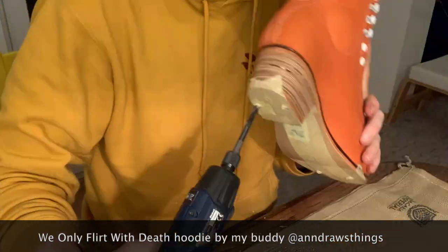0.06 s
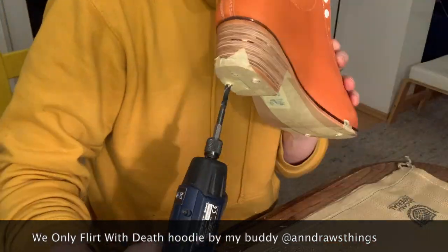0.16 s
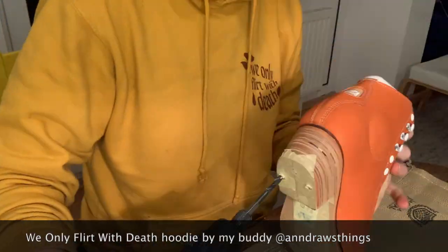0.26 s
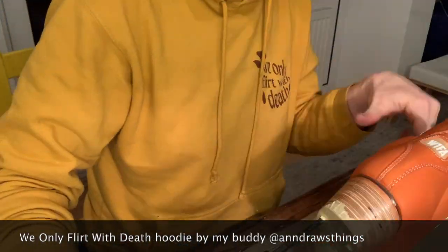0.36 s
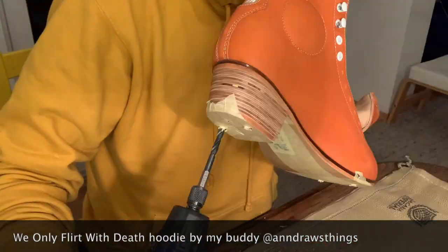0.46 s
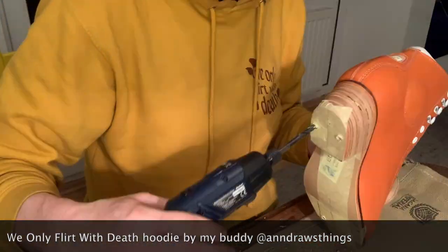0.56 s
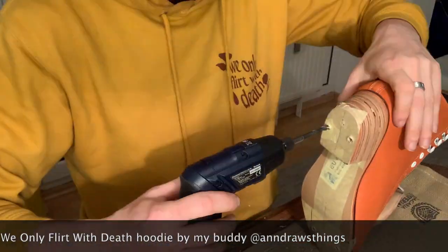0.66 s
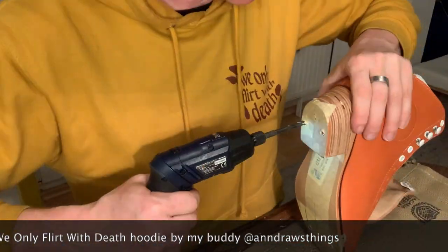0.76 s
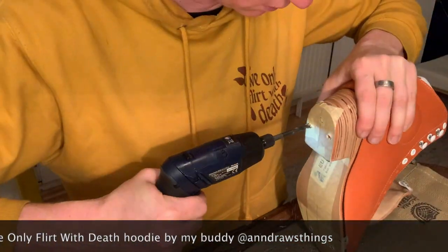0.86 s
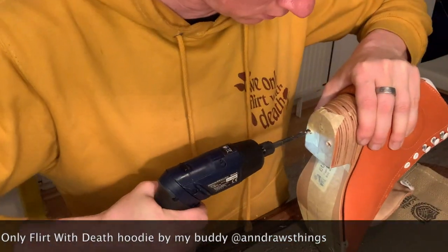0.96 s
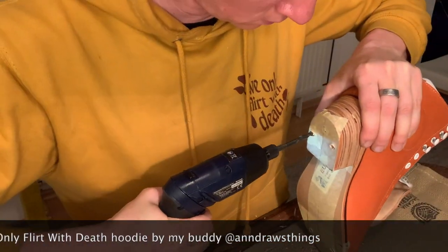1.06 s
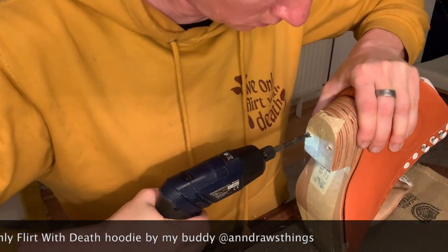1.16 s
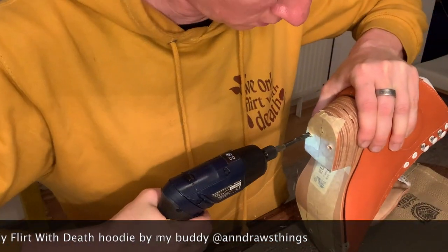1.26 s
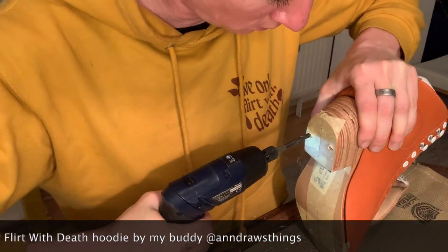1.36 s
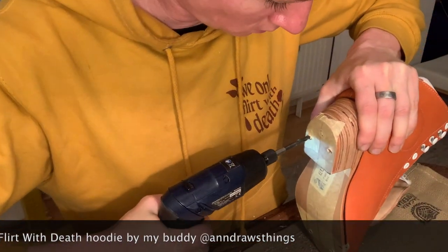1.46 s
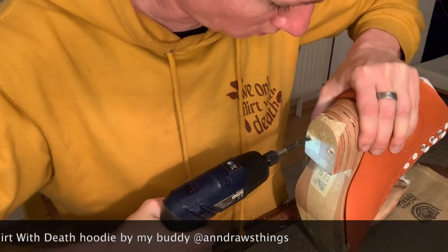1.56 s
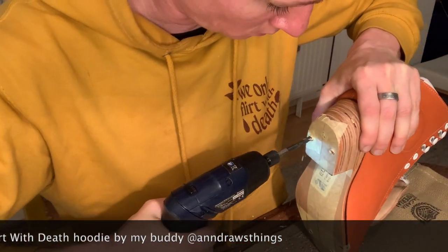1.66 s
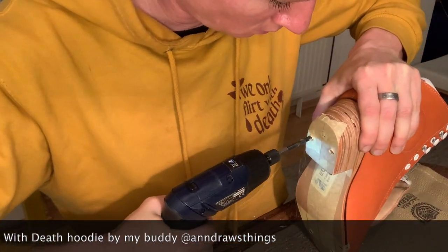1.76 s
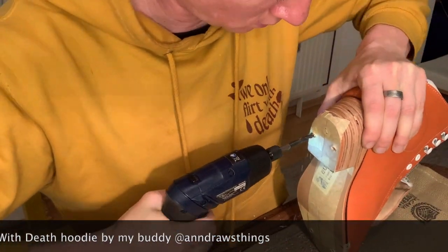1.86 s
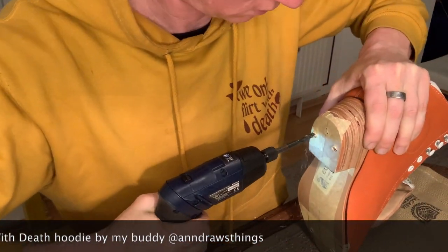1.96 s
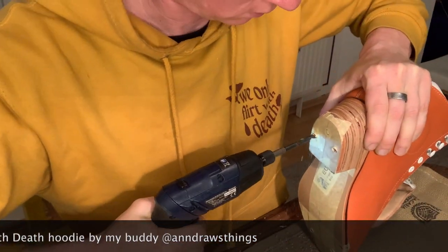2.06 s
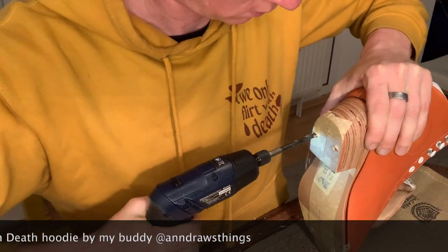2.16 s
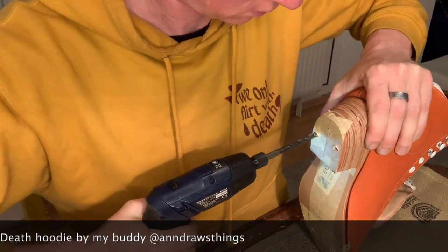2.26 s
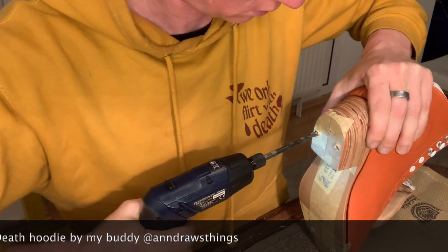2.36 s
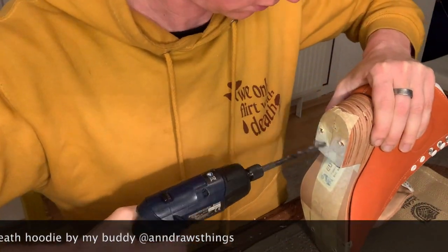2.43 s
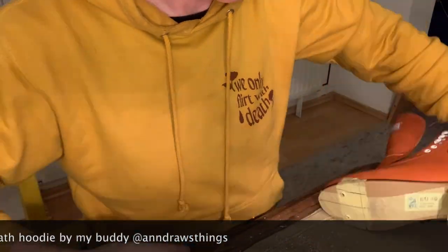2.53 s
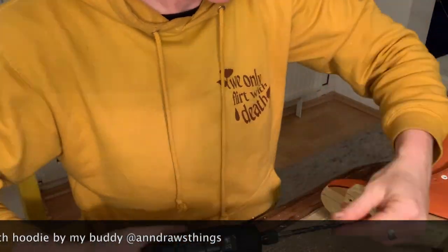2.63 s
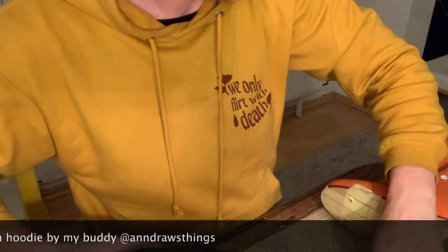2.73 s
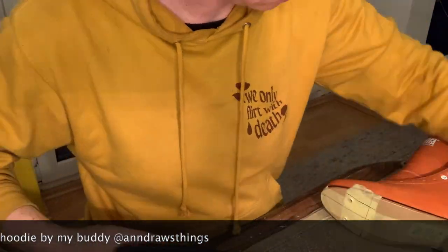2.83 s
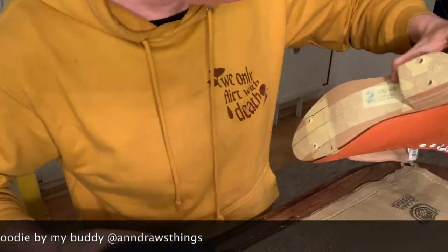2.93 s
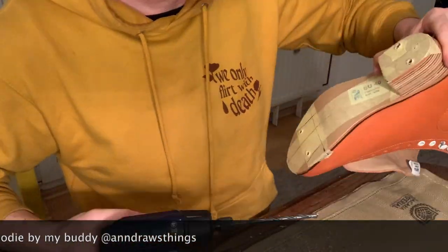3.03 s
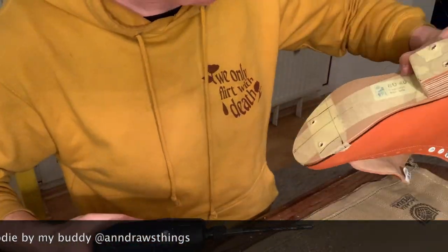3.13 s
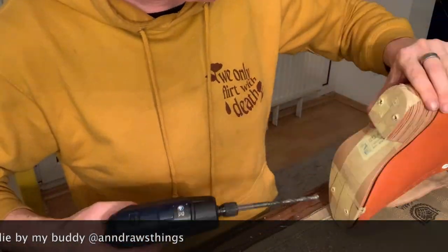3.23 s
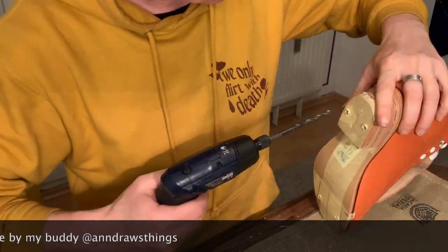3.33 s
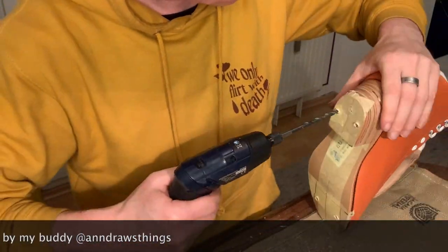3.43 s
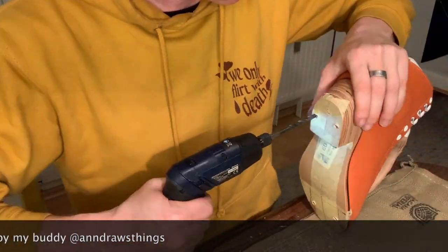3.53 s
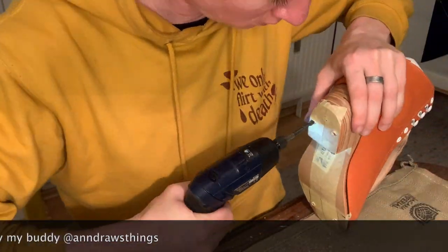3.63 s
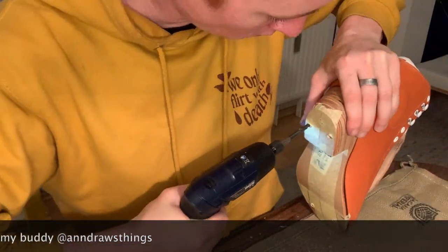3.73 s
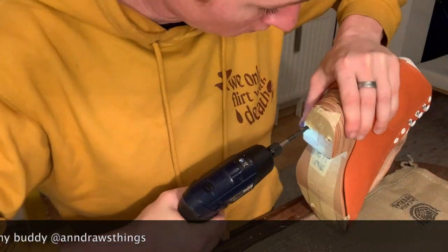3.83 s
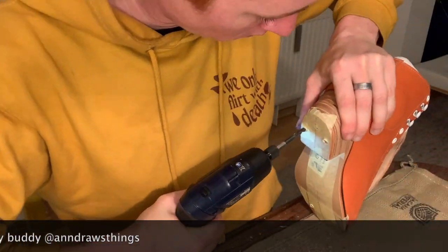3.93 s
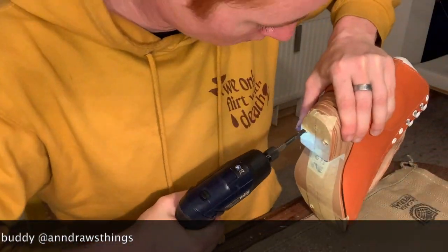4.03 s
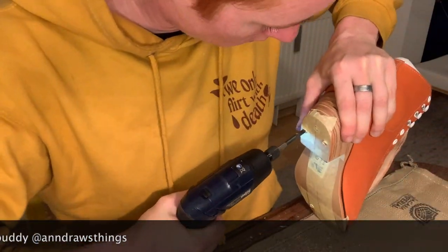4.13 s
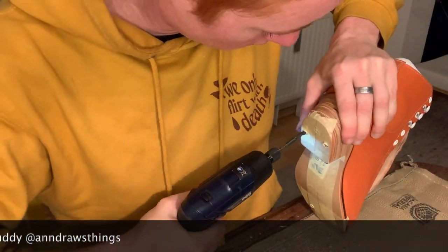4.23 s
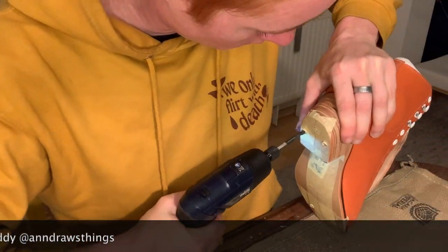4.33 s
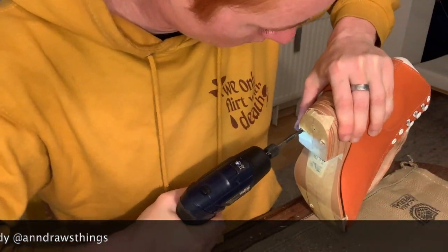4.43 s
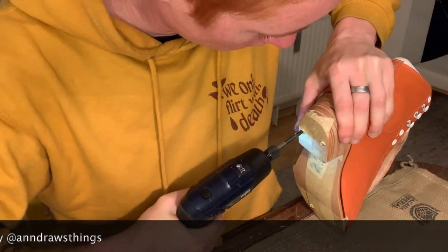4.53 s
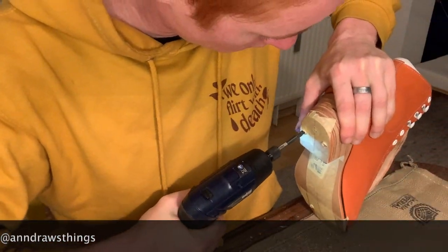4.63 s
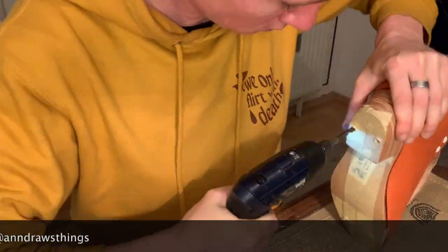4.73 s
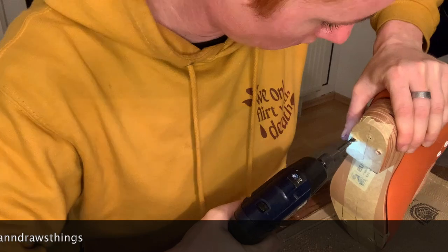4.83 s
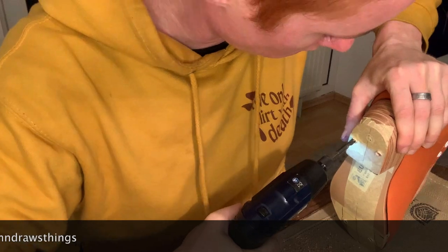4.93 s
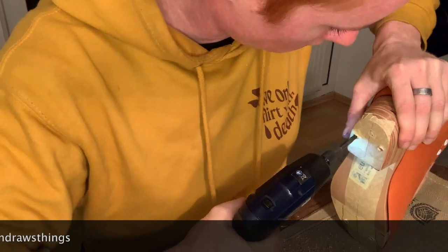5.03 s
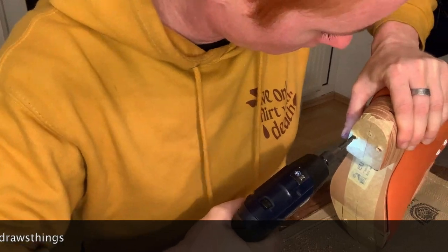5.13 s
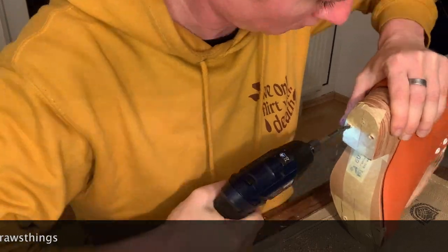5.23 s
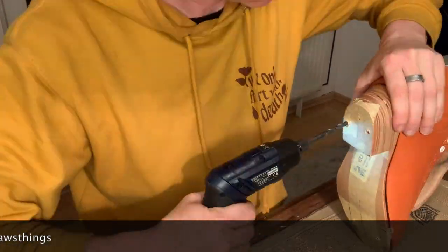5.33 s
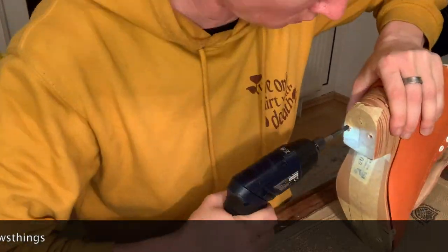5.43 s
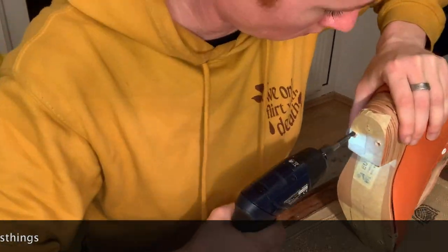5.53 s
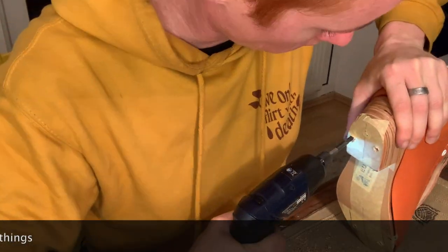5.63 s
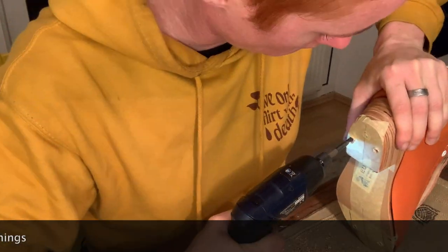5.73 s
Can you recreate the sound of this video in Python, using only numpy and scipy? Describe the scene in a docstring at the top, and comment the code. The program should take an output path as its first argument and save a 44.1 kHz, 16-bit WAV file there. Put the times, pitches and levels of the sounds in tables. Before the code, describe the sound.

Hands rustle and tick against a shoe, with two firm hollow clacks from a loose drill chuck. A small cordless drill then bores wood with a bright, gritty whine, speeds up as it eases, and stops. A clack and a sinking motor tone follow in the quiet, with light handling, before a second, more uneven bore starts and continues to the end. Close stereo microphone, small dry room.

```python
"""A small cordless drill bores twice into the wooden heel of a shoe, close to a stereo microphone in a small room.
Its tones are sines locked to one gear shaft: lower as the bit bites and snags, higher as it runs free.
Shaped noise gives the rasp of gears and wood, and drives the ring of the drill's shell.
The chuck clacks in its play as a bank of dying modes; hands and sleeves brush the shoe as swells of noise.
A free motor tone sinks after the first bore, over quiet air, two hum tones and a short diffuse room."""
import sys
import numpy as np
from scipy import signal
from scipy.fft import rfft, irfft, next_fast_len
from scipy.io import wavfile
from scipy.ndimage import uniform_filter1d, map_coordinates

SR = 44100
rng = np.random.default_rng(int(sys.argv[2]) if len(sys.argv) > 2 else 0)


def wrap_up_sound(samples):
    """Save the sound to the file named by the first command line argument, as 16-bit audio."""
    columns = np.atleast_2d(samples).T
    # keep every value between -1 and 1, then stretch to whole-number steps
    tamed = np.clip(columns, -1, 1)
    steps = np.round(tamed * 32767).astype(np.int16)
    wavfile.write(sys.argv[1], SR, steps)


N = 254898


def amp(db):
    """Decibels to gain."""
    return 10 ** (np.asarray(db) / 20)


def unit(x):
    """Scale to rms 1."""
    return x / np.sqrt(np.mean(x ** 2) + 1e-20)


def clock():
    """Time of each sample, in s."""
    return np.arange(N) / SR


def along(points, hz):
    """(f/Hz, value) points read on a log frequency axis."""
    f, v = np.transpose(points)
    return np.interp(np.log(hz + 1), np.log(f + 1), v)


def curves(rows):
    """One value per sample for each column after the time."""
    s, *cols = np.transpose(rows)
    return [np.interp(clock(), s, c) for c in cols]


def wobble(rate):
    """A smooth random curve, rate knots a second."""
    knots = rng.standard_normal(int(N * rate / SR) + 4)
    return map_coordinates(knots, [clock() * rate])


def swell(s, length):
    """A smooth rise and fall around time s."""
    return np.exp(-(2 * (clock() - s) / length) ** 2)


def ramp(x, start, end):
    """0 at start, 1 at end, held beyond."""
    return np.clip((x - start) / (end - start), 0, 1)


def filtered(x, response):
    """x times a response, real or complex, of frequency."""
    n = x.shape[-1]
    m = next_fast_len(n + 8192)
    spectrum = rfft(x, m) * response(np.fft.rfftfreq(m, 1 / SR))
    return irfft(spectrum, m)[..., :n]


def noise(spectrum):
    """Coloured noise of rms 1."""
    return unit(filtered(rng.standard_normal(N), lambda hz: amp(along(spectrum, hz))))


def add(track, s, sound):
    """Mix a sound into the track at time s."""
    part = track[max(round(s * SR), 0):][:len(sound)]
    part += sound[:len(part)]


# spectrum of the quiet room air: f/Hz, relative level/dB per Hz
AIR = [(30, -44), (130, -39), (200, -17), (280, -2), (420, -1), (620, 6.5), (800, -7.5), (1500, -14),
       (4000, -26.5), (15000, -35.5)]
HUM_LOW_DB, HUM_HIGH_DB, HUM_WAVER_DB = -73, -72.5, 1


def background():
    """Quiet room air with two hum tones that waver in level and phase."""
    low_level = amp(HUM_LOW_DB + HUM_WAVER_DB * wobble(9.7))
    low = low_level * np.sin(2 * np.pi * 307 * clock() + 0.26 * wobble(14))
    high_level = amp(HUM_HIGH_DB + HUM_WAVER_DB * wobble(4))
    high = high_level * np.sin(2 * np.pi * 622 * clock() + 1.6 * wobble(30))
    return low + high + amp(-69.5) * noise(AIR)


# resonances of the drill's shell: f/Hz, width/Hz, relative level/dB
HOUSING = [(303, 15, -15.5), (608, 60, -4.5), (778.5, 40, -3.5), (917, 45, 2), (1007, 45, -0.5),
           (1091.5, 29, 5.5), (1178, 26, -2.5), (1404, 99, -0.5), (1712, 30, -2), (1862, 73, -5),
           (2475, 55, 4), (2627, 50, -1.5)]


def housing(x):
    """The shell's resonances, summed with alternating sign, ring when x shakes them; rms 1."""
    def modes(f):
        total = 0
        for k, (center, width, db) in enumerate(HOUSING):
            resonance = 1j * f * width / (center * center - f * f + 1j * f * width)
            total = total + (-1) ** k * amp(db) * resonance
        return total

    return unit(filtered(x, modes))


# strokes of hands and sleeves: middle t/s, length/s, rub level/dB, brush level/dB
STROKES = [(0.021, 0.071, -52.5, -69), (0.127, 0.021, -84, -63.5), (0.253, 0.12, -81, -71.5),
           (.39, 0.082, -59, -66), (0.687, 0.16, -59, -70.5), (2.622, 0.054, -60, -69),
           (2.923, 0.079, -79, -74), (2.995, 0.012, -79, -67.5), (3.331, .14, -73.5, -84.5),
           (3.491, 0.012, -72, -77), (3.533, 0.052, -63, -62.5)]
# spectrum of the sleeve brush: f/Hz, relative level/dB per Hz
BRUSH = [(300, -11.5), (1500, 1.5), (4000, 6), (8000, -1.5), (15000, -7.5)]
# small ticks of handling: t/s, level/dB before the attack and decay
TICKS = [(0.0365, -55.5), (0.064, -47), (0.1166, -59), (0.334, -54), (0.384, -53), (0.4289, -58),
         (2.657, -61), (2.794, -65), (2.9917, -65), (3.5148, -56.5)]
# a finger slips on the shoe: t/s, f/Hz, level/dB
SQUEAK = (2.852, 5500, -62)


def handling():
    """Hands rub the tool, sleeves brush, and fingers tick and squeak against the shoe."""
    rubbing = sum(amp(db) * swell(s, length) for s, length, db, _ in STROKES)
    brushing = sum(amp(db) * swell(s, length) for s, length, _, db in STROKES)
    rub = rubbing * amp(2 * wobble(50)) * housing(noise([(1100, 1.0), (2500, -20.5)]))
    brush = brushing * amp(3.5 * wobble(60) + 1.1 * wobble(1400)) * noise(BRUSH)
    taps, t = np.zeros(N), np.arange(SR // 10) / SR
    for s, db in TICKS:
        attack = 1 - np.exp(-t / 0.00069)
        add(taps, s, amp(db - 60 * t / 0.027) * attack)
    ticks = taps * noise([(500, -23), (3000, -0.5), (9000, 0), (15000, -10)])
    s, hz, db = SQUEAK
    squeak = amp(db) * swell(s, 0.01) * np.sin(2 * np.pi * hz * clock() + wobble(400))
    return rub + brush + squeak + ticks


# the chuck knocks in its play: t/s, level/dB, treble relative level/dB, low modes change/dB
CLACKS = [(0.041, -56, -20, 2), (0.28, -12, -22, -4), (0.618, -7, -17.5, -3.5), (0.829, -28.5, -14, -15),
          (1.911, -28, -5.5, -29), (2.559, -15, -10.5, -7.5), (2.607, -32, -22, 11.5),
          (2.829, -35.5, -20.5, -3), (2.885, -41.5, -19, 13), (3.276, -42.5, -31, 22),
          (4.765, -29, -35, 10), (5.232, -26, -11, -14), (5.331, -28, -32.5, 0.5)]
# ringing modes of the chuck: f/Hz, relative level/dB, t60/s
CHUCK = [(273, -25, .06), (416.6, -13.5, 0.063), (528.6, -10.5, 0.078), (620, -18.5, .1), (750, -16, 0.046),
         (786, -24, 0.073), (880, -6.5, 0.041), (890, -2.5, 0.049), (1013, 2.5, .065), (1080.7, -3, 0.12),
         (1110, 0.5, 0.057), (1175, -15.5, .1), (1423, -8.5, 0.083), (1713, -18.5, .08), (2036, -30, 0.074),
         (2210, -22, 0.049), (2472, -20, .06), (2700, -15, .05)]
# spectrum of the contact noise: f/Hz, relative level/dB per Hz
CRACK = [(100, -53.5), (200, -27.5), (400, 1), (1200, 8.5), (2500, 6), (3100, -2.5), (3800, -8.5),
         (6000, -14.5), (8700, -8), (15000, -28)]


def clacks():
    """Each knock of the chuck rings its modes, with a crack and a weaker rebound."""
    out, t = np.zeros(N), np.arange(SR // 4) / SR
    hz, level, t60 = np.transpose(CHUCK)[:, :, None]
    crack = noise(CRACK)
    contact = 1 - np.exp(-(t / .0016) ** 2)  # a soft onset of a few ms
    for s, db, treble_db, low_db in CLACKS:
        # a harder blow wakes the high modes
        hard = .9 * (treble_db + 15.5) * np.clip(np.log2(hz / 1000), 0, 1)
        size, turn = rng.standard_normal((2, len(CHUCK), 1))
        mode_db = level + hard + low_db * (hz < 700) + 2.2 * size - 60 * t / t60
        modes = amp(mode_db) * np.sin(2 * np.pi * hz * (t - .002) + 0.5 * turn)
        ring = modes.sum(0)
        burst = np.roll(crack, -round(s * SR))[:len(t)] * amp(-60 * t / 0.057)
        blow = contact * (amp(db - 0.5) * ring / abs(ring).max() + amp(db + treble_db) * burst)
        add(out, s, blow)
        add(out, s + .0105, amp(-24.5) * blow)  # rebound
    # a small tool radiates no bass
    return filtered(out, lambda hz: 1 / (1 + (170 / (hz + 1)) ** 4))


# trigger held: from t/s, to t/s
BORES = [(0.789, 2.47), (3.548, 5.8)]
SPIN_UP_S, RUN_DOWN_DB_PER_S = .01, 341.5


def trigger():
    """The drive comes on almost at once and dies away after each release."""
    t = clock()
    drive = 0
    for on, off in BORES:
        drive = drive + ramp(t, on, on + SPIN_UP_S) * amp(-RUN_DOWN_DB_PER_S * np.maximum(t - off, 0))
    return drive


# each push grips the tool anew: t/s, time to bite/s, then base level/dB of
# low tooth tone, high tooth tone, whine, squeal, fizz, rattle
PUSHES = [ (.79, 0.79, -50, -47.5, -47.5, -39.5, -46.5, -52.5),
          (3.55, 0.23, -53.5, -53.5, -49.5, -38, -45, -60),
          (4.0, 0.013, -57.5, -49.5, -53, -41.5, -45, -55),
          (4.76, .12, -52.5, -50.5, -45.5, -44.5, -34, -53.5), (5.36, 0.6, -49, -50, -45, -44, -34, -52), ]


def grip():
    """How far the bit has bitten (0-1) and the levels of the push, gliding from one push to the next."""
    pushes = np.array(PUSHES)
    current = np.maximum(np.searchsorted(pushes[:, 0], clock()) - 1, 0)
    start, bite_s, *levels = pushes[current].T
    bitten = ramp(clock(), start, start + bite_s)
    return uniform_filter1d(np.array([bitten, *levels]), size=SR // 20, axis=1)


# the bit catches: t/s, share of speed lost
SNAGS = [(4.049, 0.061), (4.116, .15), (4.165, 0.0419), (4.223, .09), (4.286, .22), (4.331, .2),
         (4.363, .21), (4.464, 0.0519), (5.662, 0.067)]


def snags():
    """Share of the shaft speed lost as the bit catches in the wood."""
    return sum(lost * np.exp(-((clock() - s) / .011) ** 2) for s, lost in SNAGS)


def tooth_tone(angle, order, jitter, flutter_db):
    """One line of the gears, order cycles a shaft turn; uneven teeth blur its phase and strength."""
    wave = np.sin(order * angle + jitter * wobble(420))
    return unit(wave * amp(flutter_db * np.clip(wobble(110), -2, 2)))


# gearbox resonances that the tooth tones pass through: f/Hz, half width/Hz, lift/dB
GEARBOX = [(1447, 60, 6), (2648, 76, 9.5), (4590, 190, 15), (8100, 440, 7.5)]


def gearbox(speed, order):
    """Gain of a tooth tone as it passes the resonances of the gearbox."""
    gain = 1
    for hz, width, db in GEARBOX:
        gain = gain + (amp(db) - 1) / (1 + ((order * speed - hz) / width) ** 2)
    return gain


def gear_tones(speed, cut, snag, load, slack, low_db, high_db, whine_db, squeal_db, rasp_db):
    """Sines at multiples of one shaft angle, lifted by the gearbox and blurred by the teeth."""
    angle = 2 * np.pi * np.cumsum(speed) / SR
    low = tooth_tone(angle, order=9, jitter=.65 - .55 * load, flutter_db=1.5)
    tones = amp(low_db - 20 * snag + .8 * np.cos(cut)) * gearbox(speed, order=9) * low
    # the teeth chatter more when the load is light or the bit catches
    chatter = tooth_tone(angle, order=18, jitter=.8 - .55 * load + 5 * snag, flutter_db=2.2)
    tones += amp(high_db - 4.2 * snag + 1.1 * np.sin(2 * cut)) * gearbox(speed, order=18) * chatter
    whine = tooth_tone(angle, order=48, jitter=.95, flutter_db=3.5)
    tones += amp(whine_db + 1.4 * np.sin(cut)) * gearbox(speed, order=48) * whine
    # the top squeal jumps out at each snag
    tones += amp(squeal_db + 43 * snag) * tooth_tone(angle, order=96, jitter=0.61, flutter_db=4.0)
    # two fainter lines follow the rasp
    faint = tooth_tone(angle, order=27, jitter=0.95, flutter_db=4.5)
    tones += amp(rasp_db - 15) * gearbox(speed, order=27) * faint
    tones += amp(rasp_db - 14.0) * tooth_tone(angle, order=66, jitter=.7, flutter_db=-2)
    # a thin whistle shows only when the bit runs free
    tones += amp(-54) * slack * tooth_tone(angle, order=27, jitter=0.24, flutter_db=11)
    return tones


# the loose chuck chatters against the housing: middle t/s, length/s, level/dB
RATTLES = [(0.837, .03, -49), (0.975, 0.069, -46.5), (1.912, .03, -48), (2.242, 0.24, -54.5),
           (3.598, .07, -45), (4.37, .04, -51), (4.518, .03, -54), (4.79, .04, -55), (5.268, 0.069, -49.5),
           (5.365, .09, -46), (5.5, .04, -54)]


def rattle(throb, level_db):
    """Throbbing noise shakes the shell throughout, and harder where the loose chuck chatters."""
    steady = housing(throb * noise([(1100, -1), (2500, -1)]))
    shell = amp(level_db + 2.6 * wobble(25)) * steady
    bursts = sum(amp(db) * swell(s, length) for s, length, db in RATTLES)
    return shell + bursts * housing(throb * noise([(600, -5), (1100, 7), (2500, -16)]))


# the bit's touch on the wood changes for a moment, mostly lighter: middle t/s, length/s, change/dB
LIFTS = [(0.802, 0.089, -2.5), (3.567, .05, -0.5), (4.757, 0.071, -3), (5.333, .015, -21),
         (5.365, 0.043, 0.5)]


def bit_touch():
    """Gain of the bit's contact, which dips where it barely touches the wood."""
    return amp(sum(db * swell(s, length) for s, length, db in LIFTS))


# gear shaft, slowed as the bit is pushed in and recovering as it is drawn back,
# before snags and swing; one list per bore: t/s, turns per s
SPEED = [
    [(.79, 169), (.92, 168), (1.04, 148), (1.855, 150), (1.89, 182), (2, 190), (2.08, 184), (2.17, 197),
     (2.39, 204), (2.45, 214)],
    [(3.55, 192), (3.6, 204), (3.63, 178), (3.73, 160), (3.94, 163), (4.08, 150), (4.23, 160), (4.37, 148),
     (4.48, 147), (4.54, 163), (4.76, 180), (4.85, 149), (5.205, 150), (5.225, 178), (5.32, 201),
     (5.335, 213), (5.375, 214), (5.43, 176), (5.67, 154)],
]
# spectrum of the rasp of gears and wood: f/Hz, relative level/dB per Hz
RASP = [(30, -19.5), (170, -19.5), (300, -19.5), (900, -5.5), (2100, -7), (3200, 1.5), (3850, -10),
        (4500, 0), (5800, -1), (7500, 0.5), (10000, 2), (12500, 1), (15800, -2)]
# turns per s: deep in the wood, easing off, running free, out of the wood
LOADED_SPEED, EASY_SPEED, FREE_SPEED, SLACK_SPEED = 150, 173, 201.7, 215.2
RASP_DB = -47.5  # base level/dB of the rasp under load; the rasp, the chips and two faint gear lines are set relative to it
# change before the bit has bitten
SHALLOW_LOW_DB, SHALLOW_HIGH_DB, SHALLOW_TOP_DB = -5, 0, -12
# change from loaded to free running
EASE_LOW_DB, EASE_HIGH_DB, EASE_WHINE_DB = -14, -24, 0.5
EASE_SQUEAL_DB, EASE_FIZZ_DB, EASE_RASP_DB = -14, -11, -5.5
# further change out of the wood
SLACK_RASP_DB, SLACK_WHINE_DB, SLACK_RATTLE_DB = -4.5, -12, -10.5


def drill():
    """Gear tones over a rasp that throbs with the cutting edges, all following load: (direct, scattered)."""
    speed, = curves(np.vstack(SPEED))
    bitten, low_db, high_db, whine_db, squeal_db, fizz_db, rattle_db = grip()
    shallow = 1 - bitten
    load = ramp(speed, FREE_SPEED, LOADED_SPEED)  # the motor slows under load
    ease = ramp(speed, EASY_SPEED, FREE_SPEED)
    slack = ramp(speed, FREE_SPEED, SLACK_SPEED)

    rasp_db = RASP_DB + EASE_RASP_DB * ease + SLACK_RASP_DB * slack
    low_db = low_db + SHALLOW_LOW_DB * shallow + EASE_LOW_DB * (ease ** 2 + slack)
    high_db = high_db + SHALLOW_HIGH_DB * shallow + EASE_HIGH_DB * ease
    # at full speed the teeth go slack and the whine fades
    whine_db = whine_db + EASE_WHINE_DB * ease + SLACK_WHINE_DB * slack
    # the squeal needs a loaded gear train
    squeal_db = squeal_db + SHALLOW_TOP_DB * shallow + EASE_SQUEAL_DB * ease
    fizz_db = fizz_db + SHALLOW_TOP_DB * shallow + EASE_FIZZ_DB * ease + SLACK_RASP_DB * slack
    rattle_db = rattle_db + SLACK_RATTLE_DB * slack

    # the drag swings once and twice in nine shaft turns, and the speed swings with it
    cut = 2 * np.pi * np.cumsum(speed) / SR / 9
    snag = snags()
    swing = .012 * np.sin(cut) + .016 * np.sin(2 * cut) + .008 * wobble(90)
    speed = speed * (1 - snag + (1 + load) / 2 * swing)
    tones = gear_tones(speed, cut, snag, load, slack, low_db, high_db, whine_db, squeal_db, rasp_db)

    edges_db = .9 * np.sin(cut) + .7 * np.sin(2 * cut) + .4 * np.sin(3 * cut)
    throb = amp(edges_db + .7 * wobble(160) + 1.5 * wobble(1500))
    rasp = amp(rasp_db + 9) * throb * noise(RASP)
    fizz_noise = noise([(6000, -35), (10000, -8.5), (13000, 3.5), (14500, -3.5), (15800, 6)])
    fizz = amp(fizz_db) * throb * fizz_noise
    shell = rattle(throb, rattle_db)
    touch = bit_touch()
    chips = amp(rasp_db + 10.5) * throb * noise(RASP)  # scraping all round the hole
    direct = touch * (touch * tones + rasp + fizz) + shell
    return trigger() * np.array([direct, touch * chips])


# the motor runs out: t/s, f/Hz, level/dB
COAST = [(2.5, 590, -76), (2.62, 545, -64), (2.7, 514, -58.5), (2.8, 472, -75), (3.0, 400, -75)]


def coast():
    """The free motor tone swells, sinks in pitch and drops to a faint tone that holds."""
    hz, db = curves(COAST)
    started = clock() > COAST[0][0]
    return amp(db) * started * np.sin(2 * np.pi * np.cumsum(hz) / SR + .3 * wobble(32))


# decay of the small room: f/Hz, t60/s
ROOM = [(200, 0.095), (1500, 0.11), (6000, 0.075), (15000, 0.093)]


def room(x):
    """One diffuse answer of the room, each frequency dying at its own speed."""
    hz, t, z = signal.stft(rng.standard_normal(SR // 3), SR, nperseg=256)
    decay = amp(-60 * t / along(ROOM, hz)[:, None])
    tail = signal.istft(z * decay, SR, nperseg=256)[1]
    delayed = np.pad(tail, (90, 0))  # about 2 ms before the first reflections
    return signal.fftconvolve(x, delayed / np.linalg.norm(tail))[:N]


# colour of the side signal, the half-difference of the stereo pair: f/Hz, gain/dB
SIDE = [(60, 5.5), (110, 8), (200, 5), (380, 1), (700, -6.5), (1290, -9), (2380, -12.5), (4400, -2.5),
        (8120, -2), (15000, -4.5)]


def scene():
    """The sources sit near the middle of the pair; scraping and reflections make the width."""
    direct, scattered = drill()
    steady = direct + handling() + coast() + background()
    knocks = clacks()
    mid = steady + amp(-6) * room(steady) + knocks + amp(-9.0) * room(knocks)
    reflections = room(amp(-8.5) * steady + amp(-12.0) * knocks)
    side = filtered(scattered + reflections, lambda hz: amp(along(SIDE, hz)))

    def lean(hz):
        """Lows slightly to the first channel, treble to the second."""
        return amp(along([(1500, 0.24), (5000, -0.56)], hz) * np.array([[1], [-1]]))

    return filtered(np.array([mid + side, mid - side]), lean)


TOP_HZ = 15900


def record(dry):
    """The microphone signal keeps nothing above the band limit."""
    return filtered(dry, lambda hz: 1 / (1 + (hz / TOP_HZ) ** 500))


dry = scene()
out = record(dry)
wrap_up_sound(out)
```